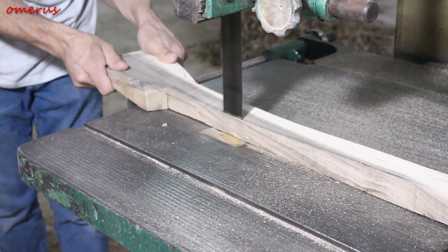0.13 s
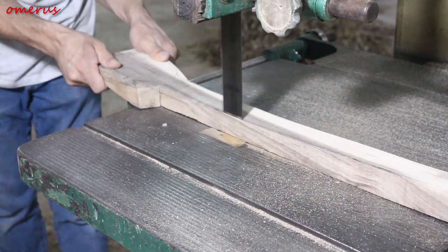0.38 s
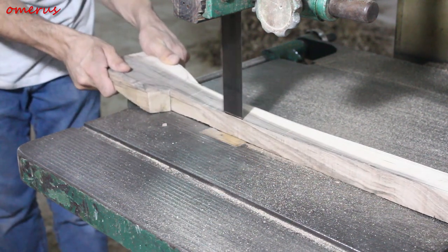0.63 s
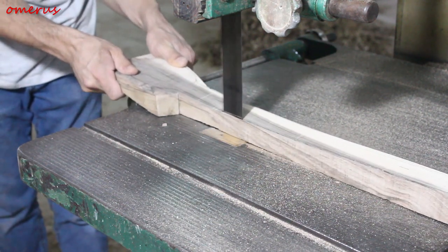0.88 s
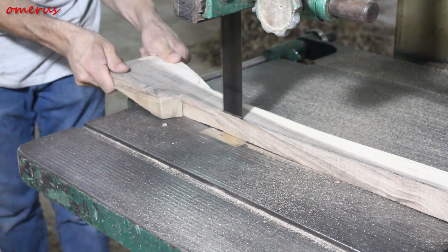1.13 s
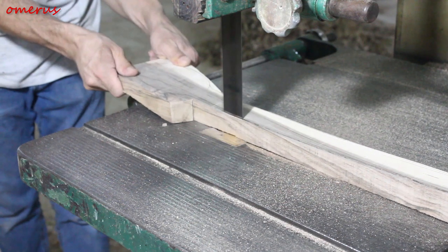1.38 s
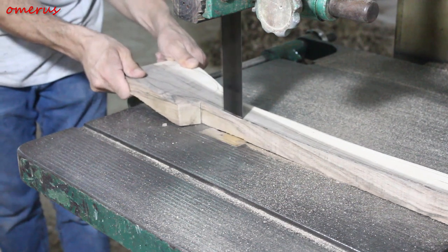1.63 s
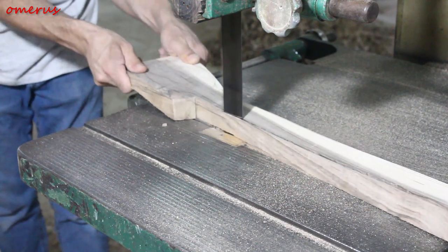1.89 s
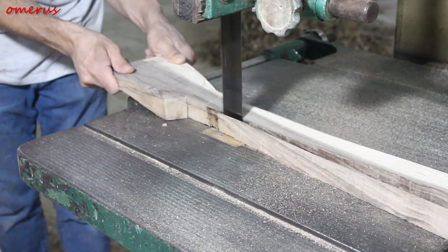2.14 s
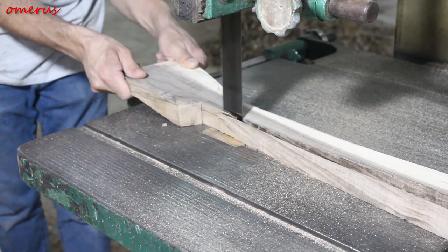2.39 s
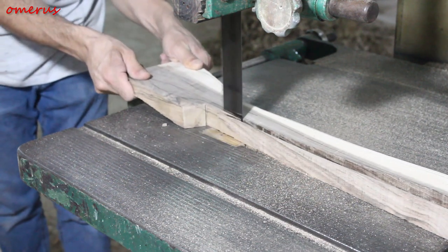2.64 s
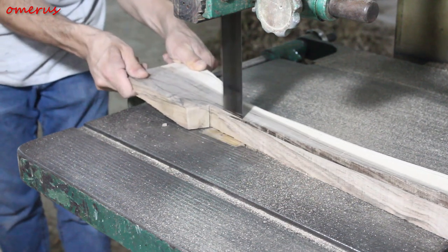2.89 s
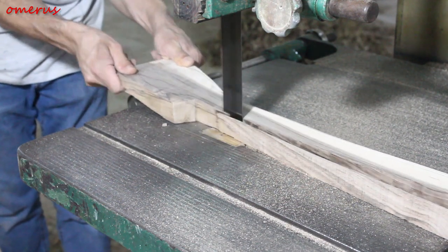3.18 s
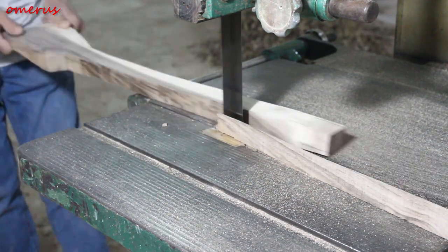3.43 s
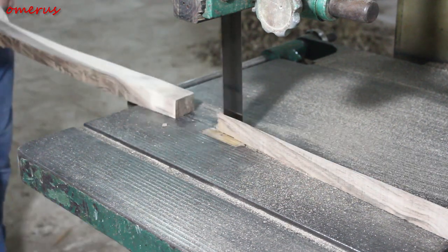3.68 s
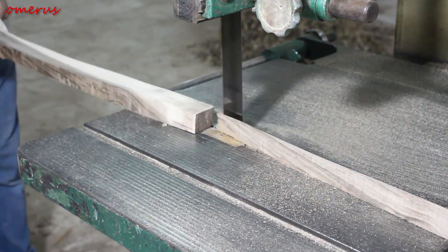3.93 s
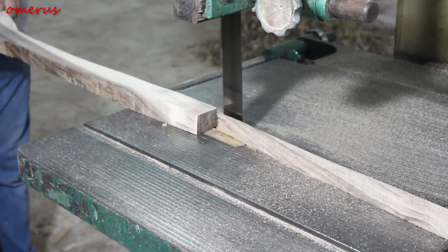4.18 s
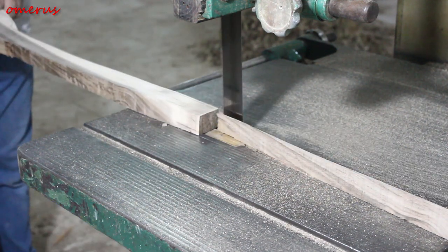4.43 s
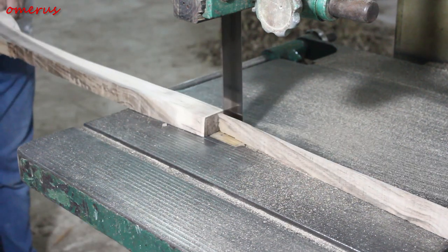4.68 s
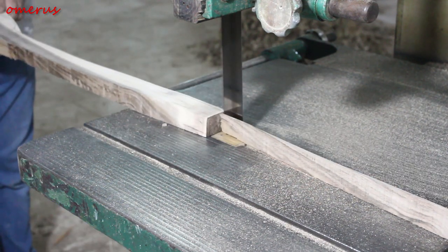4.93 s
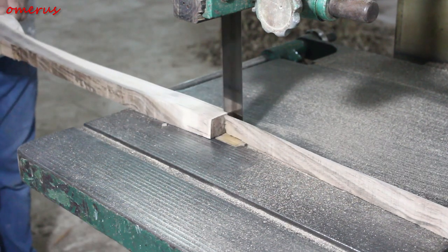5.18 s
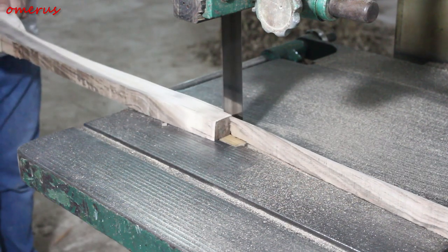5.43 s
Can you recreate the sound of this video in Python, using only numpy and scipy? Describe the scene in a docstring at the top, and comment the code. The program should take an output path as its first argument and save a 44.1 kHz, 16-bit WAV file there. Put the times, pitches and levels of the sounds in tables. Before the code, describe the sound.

A band saw runs without pause in a workshop, captured close in stereo with little bass and a sharp top limit near 16 kHz. A dense bright hiss, strongest around 9-10 kHz, stays nearly constant, over a rough frame rumble centred around 1-3 kHz that flutters about 23 times a second. Faint low drive tones and a 137 Hz hum sit underneath. From 0 to 2.1 s wood feeding adds gritty rasp and shrill squeals near 2.2 kHz with overtones: moderate at 0.7-1 s, loudest at 1.17-1.55 s, brief again near 1.9 s. From 2.2 to 3.4 s the fine rasp continues without squealing and the rumble is softer. At about 3.4 s the rasp falls away; wavering whines near 1.6 kHz and 1 kHz stand out over the hiss until about 5 s. Weak squeals return at 5-5.3 s and 5.4 s to the end as the rumble roughens slightly.

```python
"""In a workshop a band saw runs while a wooden blank is fed into it, then drawn back.
Teeth hiss as noise through the blade's high resonances and the cut adds two bands of rasping noise.
The free span sings on several modes as wavering tones; stick and slip adds squeals rich in overtones.
Behind them the frame rumbles as filtered noise that partly repeats each shaft turn, with steady
drive tones and a low hum that swells and fades. A camera cuts the bass and the top."""
import sys
import numpy as np
from scipy import signal
from scipy.fft import rfft, irfft, next_fast_len
from scipy.io import wavfile
from scipy.ndimage import uniform_filter1d

SR = 44100
rng = np.random.default_rng(int(sys.argv[2]) if len(sys.argv) > 2 else 0)


def boost(x):
    """Linear amplitude factor 10**(x/20) for a level x in decibels (scalar or array-like)."""
    u = np.asarray(x, float) / 20
    return 10 ** u


def wrap_up_sound(samples):
    """Save the sound to the file named by the first command line argument, as 16-bit audio."""
    columns = np.atleast_2d(samples).T
    # keep every value between -1 and 1, then stretch to whole-number steps
    tamed = np.clip(columns, -1, 1)
    steps = np.round(tamed * 32767).astype(np.int16)
    wavfile.write(sys.argv[1], SR, steps)


N = 245192
SIZE = next_fast_len(N)
TIME = np.arange(N) / SR
HZ = np.arange(SIZE // 2 + 1) * SR / SIZE + 1e-3  # the offset keeps logarithms and ratios finite

# load of the wood on the blade: (t/s, bite of the teeth 0-1, shake passed to the frame 0-1)
FEED = [(0, 0.7, 1), (.2, .75, 0.97), (.38, .55, 0.38), (.62, 0.73, 0.53), (.8, .7, 0.78),
        (1.0, 0.66, 0.72), (1.15, 0.9, 0.73), (1.3, .6, 0.92), (1.45, 0.94, 0.97), (1.76, .95, 0.8),
        (1.92, .65, 0.3), (2.08, 0.5, 0.65), (2.28, 0.95, 0.35), (2.45, 0.72, 0), (2.6, 0.75, .35),
        (3.26, .8, 0.26), (3.42, 0.15, 0.24), (4.0, .2, .3), (4.5, 0, .2), (5.1, .15, 0.34),
        (5.3, .25, 0.78), (5.56, .05, 0.56)]
# level of each layer: (unloaded level/dB, rise at full bite/dB, rise at full shake/dB)
HISS_LAW, RASP_LAW = (-20, -0.36, -1.53), (-36.5, 0.5, 6.7)
FINE_RASP_LAW, RUMBLE_LAW = (-36, 10.4, 0.1), (-35.5, 0.1, 4.85)

SHAFT_HZ, HUM_HZ = 22.79, 137
# drive tones: (multiple of the shaft rate, mean level/dB)
DRIVE_TONES = [(12, -74), (13, -66.5), (14, -83), (15, -61.5), (17, -60.5)]
# swells of the low hum: (start t/s, end t/s, level at start/dB, level at end/dB)
HUM_SWELLS = [(.15, 1.1, -74.5, -71), (1.57, 2.22, -67.5, -69.5), (2.9, 3.22, -73, -70.5),
              (3.3, 3.9, -75.5, -82), (4.28, 4.68, -78, -76), (4.87, 5.05, -77, -79),
              (5.48, 5.56, -76, -74)]
# slopes of level outside each swell, dB/s
HUM_EDGE_DB_PER_S, SINGING_EDGE_DB_PER_S, SQUEAL_EDGE_DB_PER_S = 90, 150, 600

# relative spectrum of the frame's rumble: (f/Hz, level per Hz/dB)
RUMBLE_COLOUR = [(15, -83), (25, -64), (228, -34.5), (325, -14.5), (544, -8.5), (604, -6.5), (683, -9),
                 (1030, -5), (1190, -4), (1300, -2), (2730, -3), (3030, -10), (3500, -12.5), (4550, -48),
                 (7700, -120)]
# centres of the frame and table resonances: (f/Hz)
FRAME_HZ = [90, 422, 499, 620, 780, 841, 920, 1050, 1118, 1260, 1308, 1365, 1418, 1442, 1620, 1738, 1862,
            1970, 2044, 2230, 2490]
# the same resonances: (width/Hz, level over the colour/dB)
FRAME_MODES = [(15, 5), (23, 3), (7.5, 11.5), (35, 3), (25, 10), (11, 2.5), (50, 4.5), (110, 6), (26, 6),
               (30, 3.5), (16, 10.6), (45, 3.6), (14, 0.5), (12, 2.8), (38, 5.8), (17, 7.7), (13, 6.5),
               (67, 5.3), (16, 10), (54, 6), (44, 5.8)]

# singing modes of the free span: (f/Hz)
SPAN_HZ = [601.5, 755.5, 890, 1016.5, 1586, 1895]
# steady part of each span mode: (unloaded mean level/dB, rise at full bite/dB, rise at full shake/dB)
SPAN_LAWS = [(-54, 3, 5.5), (-57.5, 2, 6), (-61.5, 6.5, 8.5), (-48.5, -3, 4.5), (-54, -1, 3),
             (-50.5, -3, 4.5)]
# swells of the span modes: (start t/s, end t/s, level at start/dB, level at end/dB, mode f/Hz)
SPAN_SWELLS = [(0, 0.167, -42.5, -39, 890), (.08, 0.177, -38.5, -39, 1586), (.2, .34, -43, -47, 755.5),
               (.35, .58, -41.5, -40, 1586), (.35, .44, -39.5, -41, 1016.5), (.7, .8, -41, -47, 755.5),
               (.72, 1.1, -47, -47, 890), (1.38, 1.46, -42, -44, 1895), (1.4, 1.66, -43, -39.5, 1586),
               (1.48, 1.64, -46, -41, 1016.5), (1.5, 1.78, -48, -46, 601.5), (1.9, 1.96, -45, -45, 1586),
               (2.0, 2.2, -48, -50, 890), (2.0, 2.15, -45, -47, 1016.5), (2.22, 2.32, -47, -43, 1895),
               (2.28, 2.38, -42, -42, 1586), (2.6, 3.2, -51, -51, 601.5), (2.6, 2.66, -45, -46, 1586),
               (2.62, 3.22, -53, -46, 755.5), (2.62, 3.33, -47, -48, 890), (2.88, 2.96, -44, -45, 1895),
               (2.9, 2.97, -41, -43, 1586), (3.42, 4.173, -44, -39.5, 1586), (3.65, 3.85, -47, -50, 755.5),
               (3.7, 3.95, -46, -44.5, 1016.5), (4.01, 4.12, -39, -43, 1895),
               (4.32, 5.05, -40, -44.5, 1016.5), (4.4, 4.904, -41, -40.5, 1586), (4.6, 4.8, -42, -45, 1895),
               (4.98, 5.08, -43, -43, 1895)]

# squeals of the blade in the kerf, before overtone levels and flutter:
# (start t/s, end t/s, level at start/dB, level at end/dB, level at four times the pitch over the squeal/dB)
SQUEALS = [(.04, .19, -36, -38, -10), (.42, .7, -50, -40, -9), (.72, 0.977, -35, -28, -17),
           (1.01, 1.13, -47, -48, -8), (1.168, 1.23, -29, -26.5, -13), (1.252, 1.548, -29, -32.5, -12),
           (1.58, 1.7, -41, -45, -6), (1.86, 1.94, -44, -32.5, 4), (1.955, 1.995, -32.5, -31.5, -8),
           (2.02, 2.14, -42, -50, -5), (5.0, 5.27, -50, -40, -12), (5.37, 5.56, -39, -47, -12)]
# squealing mode, sagging while the wood grips the blade and recovering when it lets go: (t/s, mean f/Hz)
SQUEAL_PITCH = [(0, 2194), (.55, 2202), (1.0, 2193), (1.16, 2199), (1.6, 2187), (1.85, 2204), (2.02, 2183),
                (2.3, 2192)]
# lowest orders of the squeal, over the squeal: (multiple, level alike/dB, level opposed between sides/dB)
SQUEAL_ORDERS = [(1, -1, -16), (2, -11.5, -22), (3, -16, -19)]

# relative spectra of the hiss, the rasp and the fine rasp: (f/Hz, level per Hz/dB)
HISS_COLOUR = [(1500, -41.5), (2500, -19), (3000, -11), (3500, -10), (4600, -10), (6000, -10), (7900, -15),
               (8700, -7.5), (9100, -2.5), (10300, -2.5), (13000, -5), (16000, -7)]
RASP_COLOUR = [(1500, -35), (2800, -9), (3800, 0.5), (4800, -1.5), (6000, -4), (9000, -65)]
FINE_RASP_COLOUR = [(3000, -40), (4800, -7), (6000, -2), (7500, 2), (8600, 1), (9500, -13), (14000, -41)]
# centres of the blade and guide resonances: (f/Hz)
BLADE_HZ = [2910, 3000, 3095, 3940, 4080, 4600, 4960, 5060, 5780, 6760, 7130, 7520, 7870, 8360, 9215, 9310,
            9450, 9630, 9850, 10150, 10800, 11420, 12000, 12450, 13300, 14100, 14700, 15550]
# the same resonances: (width/Hz, mean level over the colour/dB)
BLADE_MODES = [(100, 4.5), (90, 2.5), (60, 3), (30, -7), (60, 0), (90, 4.5), (50, -17), (50, 5.5),
               (280, -0.5), (200, 2.5), (30, -13), (100, 2.5), (30, 5.5), (80, 1.5), (70, 7.5), (100, 8.5),
               (140, 2.5), (90, 4.5), (43, 1), (60, 2), (200, 0), (80, -2.5), (150, -7), (160, -5),
               (250, -1), (130, 0), (80, -2), (250, 1)]
RING_IN_ROOM_DB = -5  # the rings point at the camera: the workshop hears them weaker

# microphone pair: (f/Hz, left minus right level/dB, left lead/rad, level of the differing room sound/dB)
PAIR = [(60, 0, 0, -14), (200, 1.5, -.05, -14), (330, 2.8, -0.34, -19), (650, 3, -0.37, -21),
        (1100, 1, -0.29, -17), (1400, 0, -0.083, -17.5), (1990, 0.5, -0.12, -20),
        (3020, -0.5, 0.046, -15.5), (4400, -2, 0, -12.5), (6500, -1, 0, -11), (9500, -1, 0, -9.5),
        (15000, 1.5, 0, -7)]
BASS_CUT_HZ, TOP_HZ = 90, 15740


def curves(table):
    """Linear interpolation: each column of a table becomes a line through time."""
    s, *columns = np.transpose(table)
    return [np.interp(TIME, s, column) for column in columns]


def over_hz(hz, values):
    """Linear interpolation on a logarithmic frequency axis."""
    return np.interp(np.log(HZ), np.log(hz), values)


def unit(x):
    """Normalisation to an rms value of 1."""
    return x / np.sqrt(np.mean(x ** 2))


def shaped(gain, source):
    """Linear filtering: the spectrum of a source times a frequency response."""
    return irfft(rfft(source, SIZE) * gain, SIZE)[..., :N]


def hump(hz, width):
    """Lorentzian power response of a single resonance."""
    return 1 / (1 + (2 * (HZ - hz) / width) ** 2)


def colour(points, modes_hz, modes):
    """Superposition of powers: resonances lift a smooth spectrum."""
    power = 1
    for hz, (width, db) in zip(modes_hz, modes):
        power = power + boost(2 * db) * hump(hz, width)
    return boost(over_hz(*np.transpose(points))) * np.sqrt(power)


def walk(rate):
    """Random fluctuation: levels held 1 / rate seconds and smoothed twice, with rms 1."""
    hold = int(SR / rate)
    steps = np.repeat(rng.standard_normal(N // hold + 1), hold)
    smooth = uniform_filter1d(uniform_filter1d(steps, hold), hold)
    return unit(smooth[:N])


def throb(once_db, twice_db):
    """Periodic modulation: tooth pressure rises once and twice a shaft turn."""
    turn = 2 * np.pi * SHAFT_HZ * TIME
    return once_db * np.cos(turn + 2.7) + twice_db * np.cos(2 * turn + 0.3)


def swells(rows, edge_db_per_s):
    """Exponential growth and decay: straight lines in dB within each swell, steady slopes outside."""
    levels = []
    for start, end, first_db, last_db in rows:
        inside_db = np.interp(TIME, [start, end], [first_db, last_db])
        outside_s = np.maximum(np.maximum(start - TIME, TIME - end), 0)
        levels.append(inside_db - edge_db_per_s * outside_s)
    return np.array(levels)


def summed(levels_db):
    """Incoherent addition: levels in dB combine as powers."""
    power = np.sum(boost(2 * np.maximum(levels_db, -200)), axis=0)
    return 10 * np.log10(power)


def loaded(law):
    """Linear load law: a level in dB follows the present bite and shake."""
    bite, shake = curves(FEED)
    rest_db, bite_db, shake_db = law
    return rest_db + bite_db * bite + shake_db * shake


def tone(hz, db, wobble_hz=0.):
    """Frequency modulation: phase, from a random start, integrates a wavering pitch; also gives the peak."""
    cycles = rng.random() + np.cumsum(hz + wobble_hz * walk(15.)) / SR
    return 2 * np.pi * cycles, np.sqrt(2) * boost(db)


def drive():
    """Harmonics of rotation: tones at multiples of the shaft rate, joined by a low hum."""
    hum_db = summed(swells(HUM_SWELLS, HUM_EDGE_DB_PER_S))
    parts = [tone(k * SHAFT_HZ, db + 1.3 * walk(2.78)) for k, db in DRIVE_TONES]
    parts.append(tone(HUM_HZ, hum_db, 0.62))
    return sum(peak * np.sin(phase) for phase, peak in parts)


def machine(rumble_db):
    """Periodic excitation: wheels and belt rattle the frame, partly alike on every shaft turn."""
    again = 0.55 * np.exp(-HZ / 950.0)  # share that returns one turn later, less towards the treble
    comb = np.sqrt(1 - again ** 2) / (1 - again * np.exp(-2j * np.pi * HZ / SHAFT_HZ))
    rattle = rng.standard_normal((2, N)) * boost(0.42 * walk(12.) + throb(0.69, 0.58))
    rumble = shaped(comb * colour(RUMBLE_COLOUR, FRAME_HZ, FRAME_MODES), rattle)
    return unit(rumble) * boost(rumble_db)


def singing():
    """Self-sustained oscillation: each span mode is a slightly wavering tone, more so when higher."""
    rows = np.array(SPAN_SWELLS)
    nearest = np.argmin(np.abs(rows[:, -1:] - SPAN_HZ), axis=1)
    sound = 0
    for k, (hz, law) in enumerate(zip(SPAN_HZ, SPAN_LAWS)):
        steady_db = loaded(law) + 1.9 * walk(8.)
        swells_db = swells(rows[nearest == k, :-1], SINGING_EDGE_DB_PER_S)
        db = summed([steady_db, *swells_db]) + 1.6 * walk(25.)
        phase, peak = tone(hz, db, 0.002495 * hz)
        sound = sound + peak * np.sin(phase)
    return sound


def squeal():
    """Stick and slip locks to one blade mode; jerky motion adds overtones. Gives alike and opposed parts."""
    rows = np.array(SQUEALS)
    each_db = swells(rows[:, :-1], SQUEAL_EDGE_DB_PER_S)
    db = summed(each_db)
    fourth_db = summed(each_db + rows[:, -1:])
    flutter_db = 1.2 * walk(30.0) + throb(0.67, 0.4)
    phase, peak = tone(*curves(SQUEAL_PITCH), flutter_db, 2.46)
    alike = boost(fourth_db) * np.sin(4 * phase)
    opposed = 0
    for k, order_db, side_db in SQUEAL_ORDERS:
        alike = alike + boost(db + order_db) * np.sin(k * phase)
        opposed = opposed + boost(db + side_db) * np.cos(k * phase)
    return peak * alike, peak * opposed


def ringing(excite):
    """Modal response: each blade resonance swells and fades on its own as the band runs through guides."""
    spectrum = rfft(excite, SIZE) * boost(over_hz(*np.transpose(HISS_COLOUR)))
    rings = 0
    for hz, (width, db) in zip(BLADE_HZ, BLADE_MODES):
        ring = irfft(spectrum * hump(hz, width), SIZE)[:, :N]
        rings = rings + ring * boost(db + 1.1 * walk(14.))
    direct_and_room = np.array([[1], [boost(RING_IN_ROOM_DB)]])
    return irfft(spectrum, SIZE)[:, :N] + rings * direct_and_room


def teeth(hiss_db, rasp_db, fine_db):
    """Dense impacts act as noise: tooth contacts ring a wobbling blade, so all bands flutter together."""
    flutter_db = 0.5 * walk(45.) + 0.47 * walk(300.)
    contacts = rng.standard_normal((3, 2, N))  # three layers, each with a direct and a room part
    hiss = ringing(contacts[0] * boost(flutter_db + throb(0.37, 0.24) + 0.14 * walk(25.0)))
    grain_db = flutter_db + throb(0.58, 0.3)
    rasp_source = contacts[1] * boost(grain_db + 0.57 * walk(24.83))
    rasp = shaped(colour(RASP_COLOUR, BLADE_HZ, BLADE_MODES), rasp_source)
    fine_source = contacts[2] * boost(grain_db + 1.05 * walk(25.46))
    fine = shaped(colour(FINE_RASP_COLOUR, BLADE_HZ, BLADE_MODES), fine_source)
    return unit(hiss) * boost(hiss_db) + unit(rasp) * boost(rasp_db) + unit(fine) * boost(fine_db)


def scene():
    """Superposition: direct sound is common to both sides bar level and phase; the room share differs."""
    cut = teeth(loaded(HISS_LAW), loaded(RASP_LAW), loaded(FINE_RASP_LAW))
    direct, room = cut + machine(loaded(RUMBLE_LAW))
    squeal_alike, squeal_opposed = squeal()
    middle = direct + drive() + squeal_alike + singing()
    hz, pan_db, lead, room_db = np.transpose(PAIR)
    # each side takes half of the level and phase difference
    half = boost(over_hz(hz, pan_db) / 2) * np.exp(0.5j * over_hz(hz, lead))
    side = shaped(boost(over_hz(hz, room_db)), room) + squeal_opposed
    return shaped(np.array([half, 1 / half]), middle) + np.array([side, -side])


def top_cut(x):
    """Nothing passes above the cut-off."""
    return signal.sosfilt(signal.butter(12, 16460, fs=SR, output="sos"), x)


def record(dry):
    """Band limiting: the camera cuts the lowest bass gradually and the top sharply."""
    band = (HZ < TOP_HZ) / np.sqrt(1 + (BASS_CUT_HZ / HZ) ** 4)
    return top_cut(shaped(band, dry))


dry = scene()
out = record(dry)
wrap_up_sound(out)
```